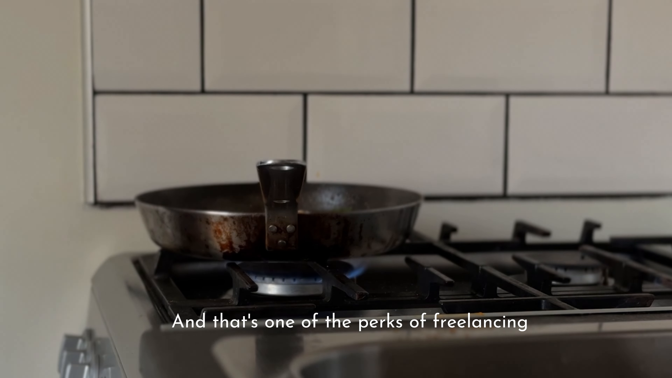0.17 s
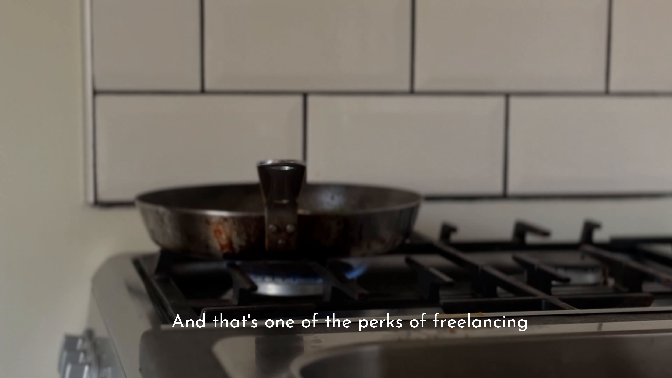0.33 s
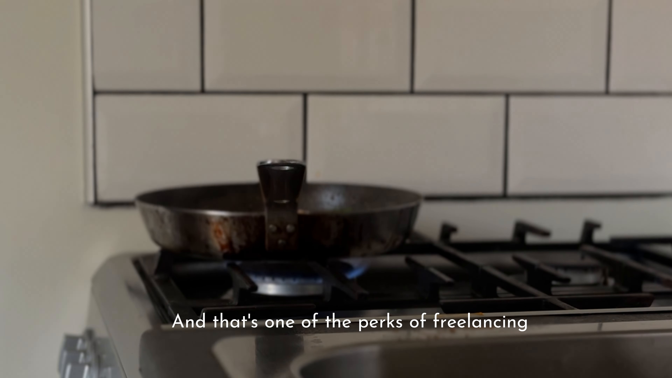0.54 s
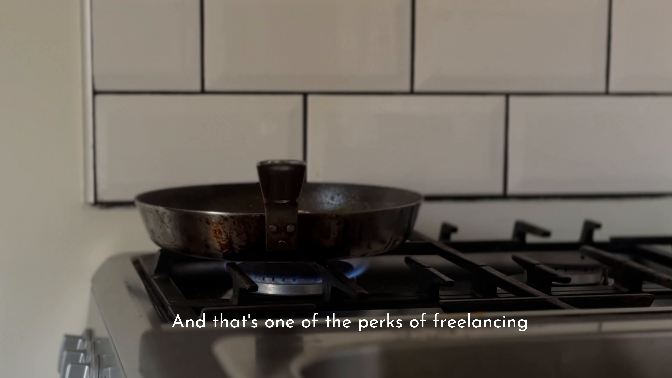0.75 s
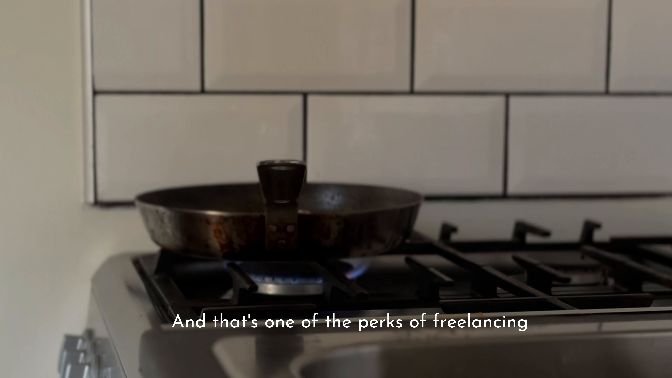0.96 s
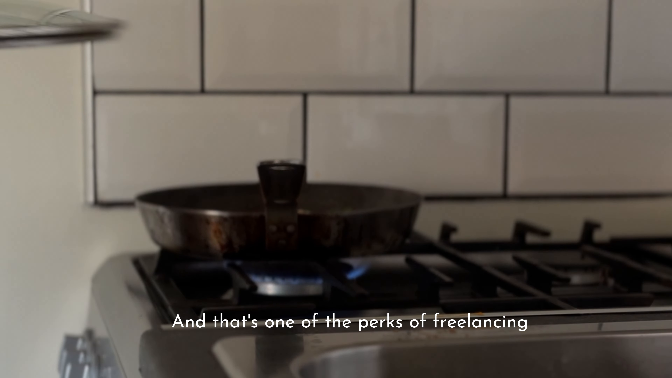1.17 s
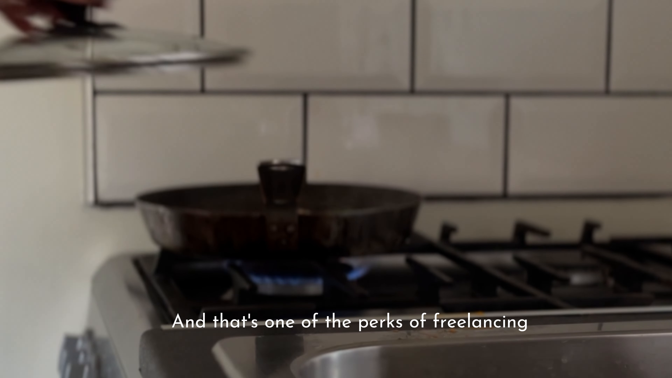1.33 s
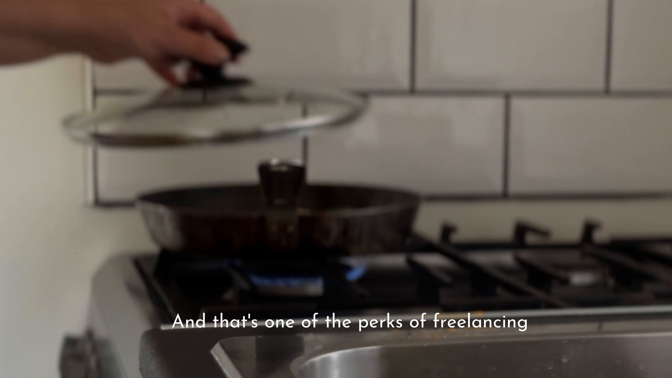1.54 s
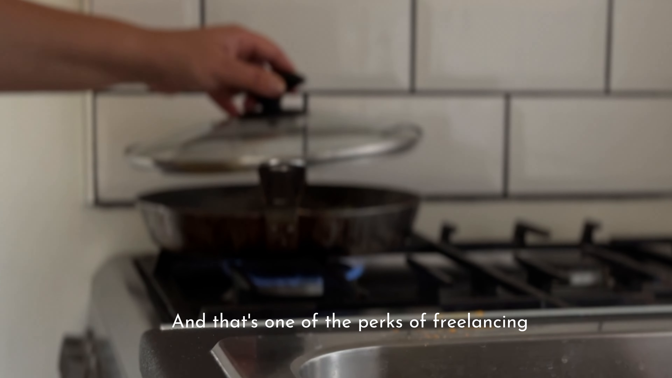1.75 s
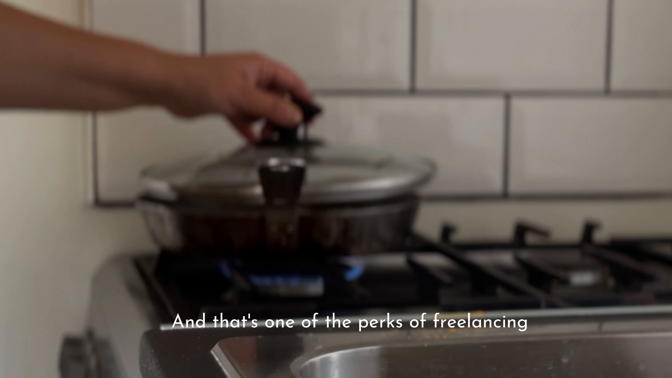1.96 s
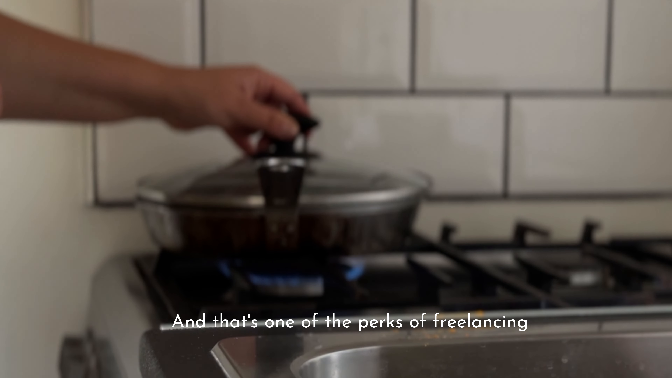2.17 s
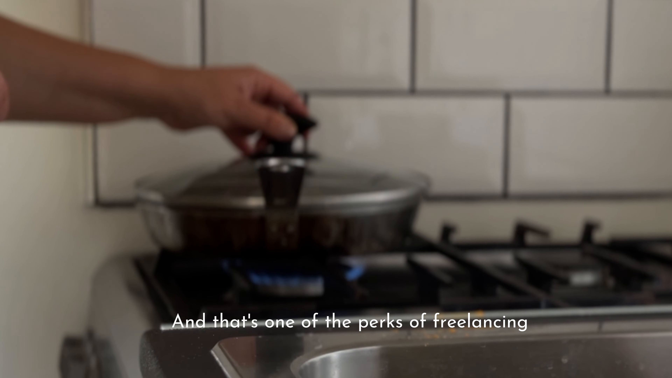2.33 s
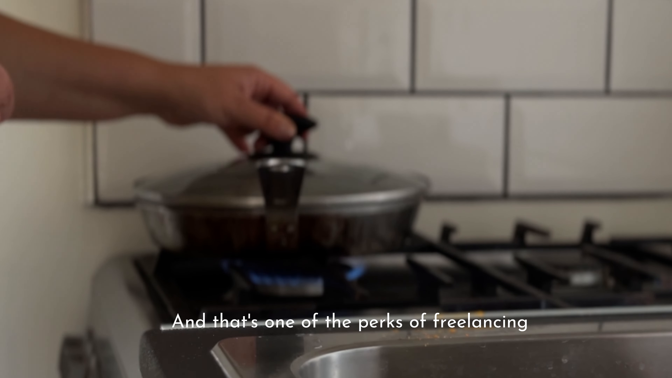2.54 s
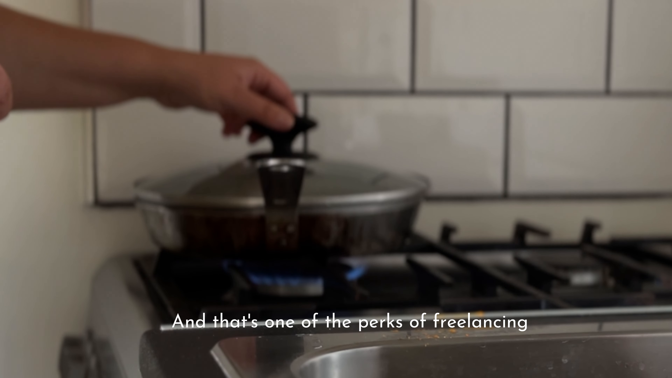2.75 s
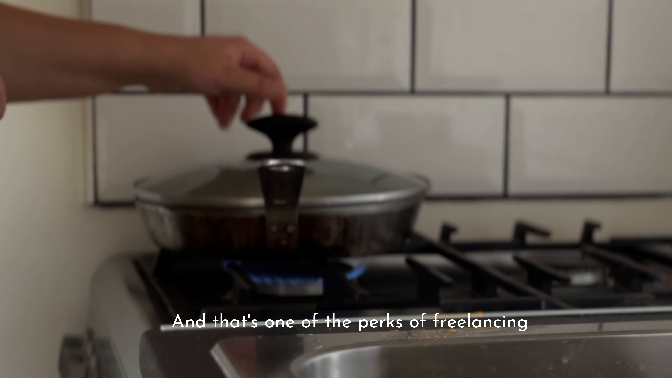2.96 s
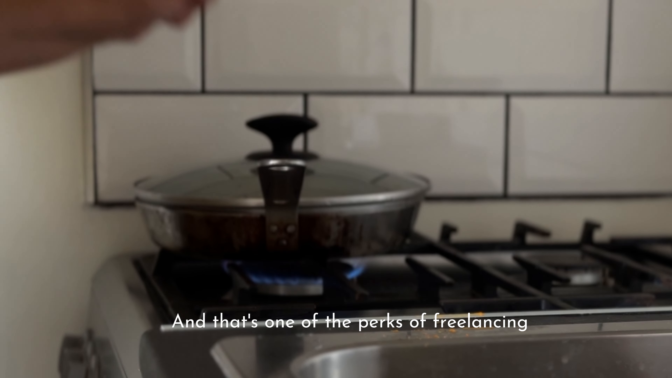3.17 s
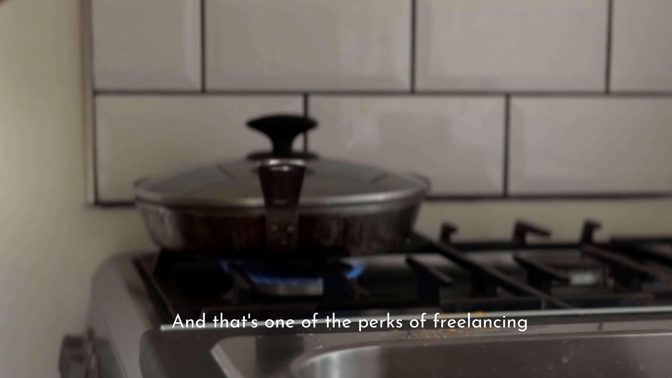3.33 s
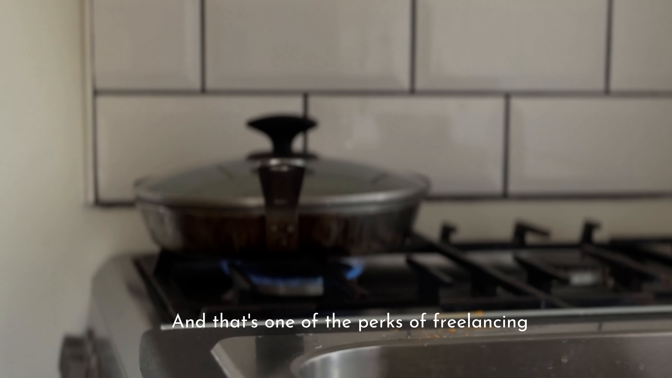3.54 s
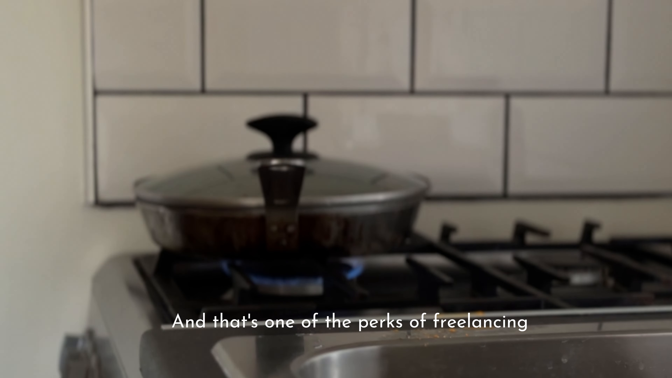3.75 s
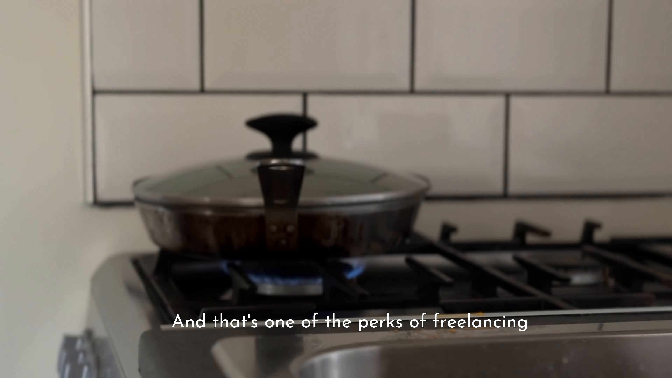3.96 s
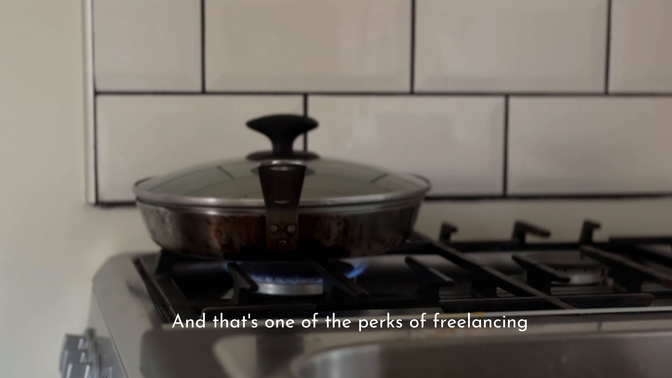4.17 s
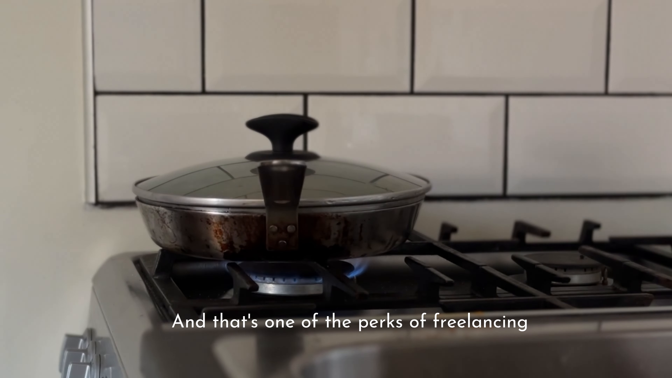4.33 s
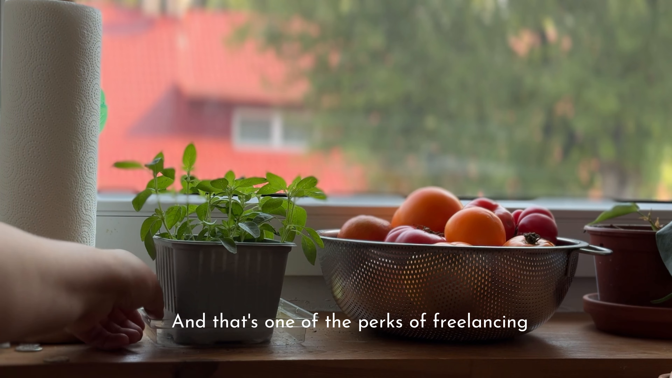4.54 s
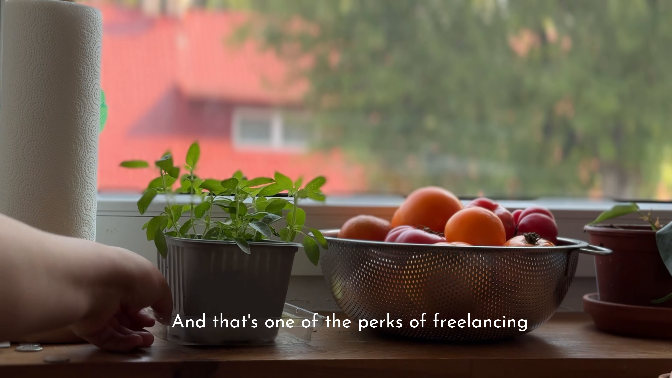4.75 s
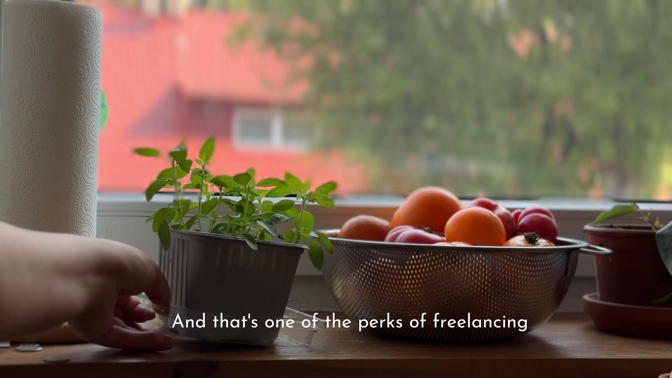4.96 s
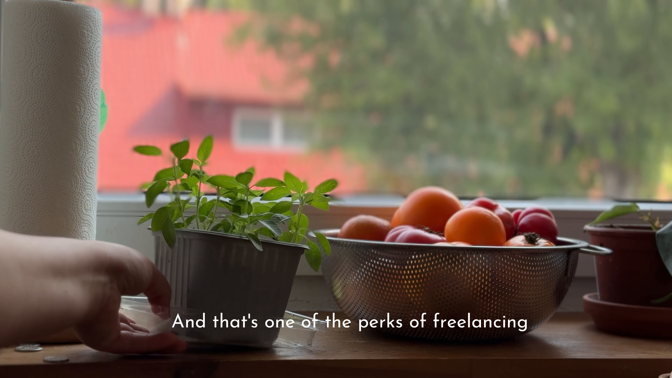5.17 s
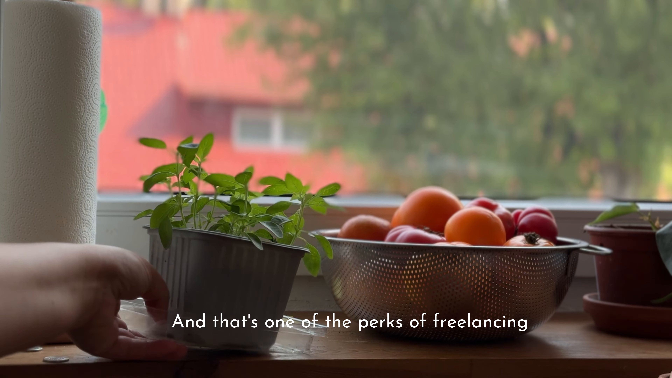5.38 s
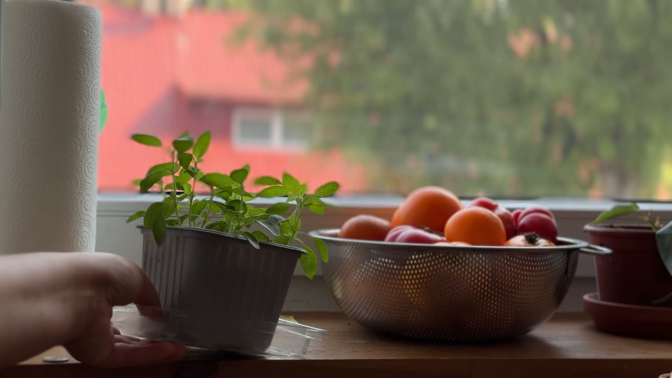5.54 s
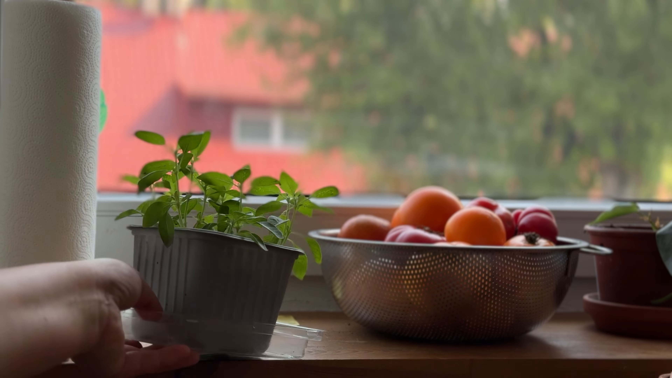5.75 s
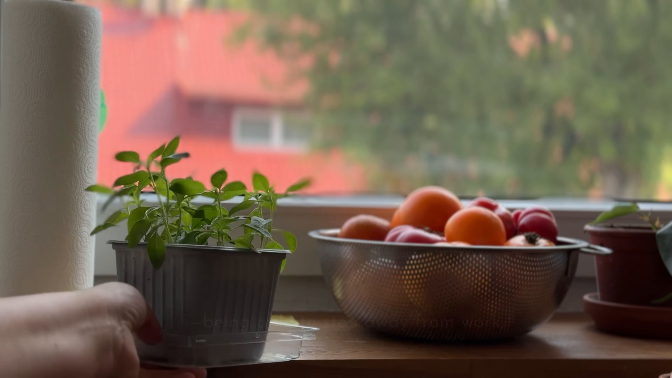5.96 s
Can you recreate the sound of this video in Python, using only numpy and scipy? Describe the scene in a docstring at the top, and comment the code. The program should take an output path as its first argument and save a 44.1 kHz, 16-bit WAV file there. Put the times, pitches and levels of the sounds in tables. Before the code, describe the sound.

From the start a gas ring burns close by in a small kitchen: a flickering low roar, swelling and settling, under a steadier soft hiss. Faint rustles and short hollow scrapes suggest someone busy nearby, with a small knock at 0.5 s and a soft tick at 1.8. At about 2.06 to 2.2 s a glass lid meets the metal pan in a quick cluster of knocks, clanking and ringing briefly, with a low hob boom damped by 2.4. A light bright tick follows at 3.1, then mostly flame, with a small click and rub near 3.8. At 4.6 s the burner cuts abruptly to quiet, low room air at a window sill. A thin plastic pot rustles and scrapes over a plastic tray; crisp snaps and dull thuds gather from 5.2, strongest at 5.6, continuing lightly until 6 s. Stereo, slightly roomy.

```python
"""A gas ring roars and hisses softly (coloured noise that swells) while a glass lid knocks and rattles home
(fading sine tones, dull noise and bright cracks). Then, at a quieter window sill, a thin plastic pot is
dragged over a plastic tray: noise grains scrape and rustle, short noise bursts snap, low tones thud.
A small microphone pair hears it all in stereo, a little roomy."""
import sys
import numpy as np
from scipy import signal
from scipy.fft import rfft, irfft, next_fast_len
from scipy.io import wavfile
from scipy.ndimage import uniform_filter1d

SR = 44100
rng = np.random.default_rng(int(sys.argv[2]) if len(sys.argv) > 2 else 0)


def digitize_waveform(pressure):
    """Quantize a signal to 16-bit integers and store it at the path in sys.argv[1].

    Rows of a 2-D input are taken as channels; values are limited to [-1, 1].
    """
    field = np.atleast_2d(pressure).T
    bounded = np.clip(field, -1, 1)
    quanta = np.round(bounded * 32767).astype(np.int16)
    wavfile.write(sys.argv[1], SR, quanta)


def field_ratio(decibels):
    """Amplitude ratio for a level in dB (20 dB per decade); scalars and array-likes work."""
    return 10 ** (np.asarray(decibels, dtype=float) / 20)


N = 264820
PADDED = next_fast_len(N)  # length for quick filtering [samples]
HZ = np.maximum(np.fft.rfftfreq(PADDED, 1 / SR), 1)
TIME = np.arange(N) / SR
MOVE_S = 4.585  # the stove gives way to the sill


def unit(x):
    """Scale to rms 1."""
    return x / np.sqrt(np.mean(x ** 2))


def along(table, at):
    """Columns of a table read between its rows."""
    key, *columns = np.transpose(table)
    return [np.interp(at, key, column) for column in columns]


def colour(table):
    """Gain per frequency from (frequency [Hz], level [dB]) points."""
    hz, db = np.transpose(table)
    return field_ratio(np.interp(np.log(HZ), np.log(hz), db))


def hump(hz, octaves):
    """Bell-shaped gain around a centre frequency."""
    return np.exp(-(np.log2(HZ / hz) / octaves) ** 2 / 2)


def shape(x, gain):
    """Filter by a gain per frequency."""
    return irfft(rfft(x, PADDED) * gain, PADDED)[..., :N]


def air():
    """White noise at 0 dB per Hz, one for each of two paths to the microphone."""
    return rng.standard_normal((2, N)) * np.sqrt(SR / 2)


def walk(rate):
    """Smoothly wandering random values, a new one every 1 / rate seconds; spread near 0.7."""
    k = int(SR / rate)
    steps = np.repeat(rng.standard_normal(N // k + 1), k)
    return 0.98 * uniform_filter1d(uniform_filter1d(steps, k), k)[:N]


def fade(start, t60, rise):
    """Envelope of a hit: quick rise, exponential fall, over after 90 dB."""
    out = np.zeros(N)
    span = slice(int(start * SR) + 1, int((start + 3 * t60 / 2) * SR))
    t = TIME[span] - start
    out[span] = (1 - np.exp(-t / rise)) * field_ratio(-60 * t / t60)
    return out


def stove():
    """Turbulent flame: a flickering low roar and burn, with a steadier jet hiss above them."""
    # roar and hiss before the flame's swells: (frequency [Hz], level [dB per Hz])
    flame_colour = [(20, -92), (42, -71), (60, -76), (180, -76), (400, -80.5), (700, -85), (1400, -90),
                    (1900, -101), (4000, -104), (5500, -101), (8500, -100), (11800, -105), (12600, -110),
                    (16000, -112)]
    # resonances: cupboards and walls low down, overtones of the burner's mixing tube above 1 kHz:
    # (frequency [Hz], width [Hz], level [dB per Hz])
    resonances = [(44.7, 3.4, -68), (84, 5.8, -63), (149.6, 18, -72), (1087, 234, -84.5), (1670, 93, -90.5),
                  (2360, 65, -97), (2910, 54, -92), (3400, 170, -99), (4050, 27, -101)]
    # the flame swells and settles: (time [s], gain of the roar [dB], gain of the burn [dB])
    swells = [(0, 3, 7.5), (0.27, 3.5, 4), (1.23, 3, 5.5), (1.5, 1.5, 2), (2.02, 1, 2.2), (2.45, 1.7, -1.5),
              (2.65, 0.7, 1.5), (3.5, 2.5, -1), (3.85, 0.8, 2), (4.2, 3.5, 0), (4.45, 0.6, 0.8),
              (4.58, -1, -1)]
    peaks = sum(field_ratio(2 * db) / (1 + (2 * (HZ - hz) / width) ** 2) for hz, width, db in resonances)
    gain = np.sqrt(colour(flame_colour) ** 2 + peaks)
    low_db, mid_db = along(swells, TIME)
    # shares of the power: roar below 330 Hz, hiss above 1800 Hz, burn between
    low = 1 / (1 + (HZ / 330) ** 4)
    high = 1 / (1 + (1800 / HZ) ** 6)
    roar = shape(air(), gain * np.sqrt(low)) * field_ratio(low_db + 1.4 * walk(9))
    burn = shape(air(), gain * np.sqrt((1 - low) * (1 - high))) * field_ratio(mid_db + 2.45 * walk(14))
    hiss = shape(air(), gain * np.sqrt(high)) * field_ratio(0.25 * walk(10.2))
    return roar + burn + hiss


def lid():
    """Each touch rings the same modes with new phases and adds a crack, brighter when hard; the hob booms."""
    # lid meets the rim: (time [s], blow level [dB], crack level relative to the blow [dB])
    touches = [(2.059, -15, -24), (2.089, -33.5, -1.5), (2.093, -12.5, -33), (2.113, -18.5, -41),
               (2.131, -37, -31), (2.163, -28.5, -28), (2.211, -33, -16)]
    # ringing modes of lid and pan: (frequency [Hz], relative level [dB], t60 [s])
    modes = [(130.7, -9, 0.53), (186.5, -4.5, 0.25), (213.3, -5, 0.23), (340, -12.5, 0.22),
             (434, -8.5, 0.54), (468, 0.5, 0.24), (526.7, 1.5, 0.25), (577, 4.5, 0.16), (625, 1, .2),
             (810, -19, 0.13), (900, -18, 0.22), (1036, -13, 0.35), (1410, -26, 0.38), (1533, -17, 0.27),
             (2261, -25.5, .25), (2630, -19, 0.22)]
    # boom of the hob panel: (frequency [Hz], level [dB], t60 [s])
    boom = (86, -27.5, 1.5)
    boom_start_s, boom_stop_s = 2.098, 2.385  # the hob panel booms until the hand presses down
    side_rad, side_scatter_rad = 2.4, 1  # the lid sits off to one side: its second path runs ahead

    out = np.zeros((2, N))
    crack = unit(shape(air(), hump(2160, 1.0)))
    clank = unit(shape(air(), hump(510, 1.06)))
    chance = rng.standard_normal((len(touches), len(modes), 2, 1)) * [[1.1], [side_scatter_rad]]
    chance[:, :, 1] += chance[:, :, 0] + side_rad
    near = slice(int(touches[0][0] * SR), int((touches[-1][0] + 1) * SR))
    for (start, db, hard_db), phases in zip(touches, chance):
        # the soft push peaks a few ms in, where the modes swing together
        t = TIME[near] - start - 0.005
        for (hz, mode_db, t60), phase in zip(modes, phases):
            tone = np.cos(2 * np.pi * hz * t + phase)
            out[:, near] += field_ratio(db - 9.5 + mode_db) * fade(start, t60, 0.0025)[near] * tone
        out += field_ratio(db - 18.0) * clank * fade(start, 0.23, 0.0027)  # modes too dense to tell apart
        crack_fade = fade(start, 0.027, 0.00069) + field_ratio(-8) * fade(start, 0.32, 0.0052)
        out += field_ratio(db + hard_db) * crack * crack_fade
    hz, db, t60 = boom
    held = np.clip((boom_stop_s - TIME) / 0.025, 0, 1)
    boom_level = field_ratio(db + 1.3 * walk(25.1)) * held * fade(boom_start_s, t60, 0.02)
    return out + boom_level * np.sin(2 * np.pi * hz * TIME)


def snaps():
    """Thin plastic or metal gives: a bright crack with weaker slips after it, and a ringing body."""
    # metal and glass touched at the stove:
    # (time [s], body level [dB], centre [Hz], width [octaves], t60 [s], crack level [dB])
    ticks = [(0.538, -32, 620, 0.7, 0.048, -55), (1.760, -30, 1290, 1.64, 0.2, -53),
             (3.07, -47, 7040, 1.2, 0.2, -41), (3.798, -36, 1140, 1.5, 0.045, -40.5)]
    # the plastic pot and tray snap: (time [s], body level [dB], centre [Hz], crack level [dB])
    plastic = [(4.641, -60, 3400, -46), (4.699, -53.5, 4900, -41), (4.756, -58, 4970, -58),
               (5.186, -48, 2840, -55), (5.224, -49, 3420, -31), (5.266, -38, 6050, -25),
               (5.377, -44, 3000, -34), (5.401, -45, 3000, -31), (5.549, -36, 2950, -33.5),
               (5.582, -35, 5200, -31), (5.6198, -25, 2420, -25.5), (5.72, -34, 2200, -32),
               (5.83, -49.5, 3260, -32.5), (5.933, -54, 3000, -31.5), (5.963, -52, 3170, -56)]
    tick_rise_share = 0.047  # rise time as a share of t60: long rings come from soft, sliding contacts
    snap_octaves, snap_t60_s, snap_rise_s = 0.5, 0.16, 0.0009
    # the contact itself is a short pulse over the body level; slower contacts click less
    click_db, click_cycles, hard_rise_s = 10, 0.51, 0.0018

    out, white = np.zeros((2, N)), air()

    def ring(hz, octaves):
        """Noise of rms 1 around one pitch, the body's sound before it fades."""
        return unit(shape(white, hump(hz, octaves)))

    crack = ring(7900, 1.9)
    crinkle = field_ratio(1.75 * walk(250))  # the sheet buckles unevenly while it rings
    hits = [(*row, tick_rise_share * row[4]) for row in ticks]
    for start, db, hz, crack_db in plastic:
        hits.append((start, db, hz, snap_octaves, snap_t60_s, crack_db, snap_rise_s))
    for start, db, hz, octaves, t60, crack_db, rise in hits:
        body_fade = fade(start, t60, rise) + field_ratio(-18.5) * fade(start, 0.38, 0.02)
        out += field_ratio(db) * ring(hz, octaves) * crinkle * body_fade
        crack_fade = fade(start, 0.014, 0.00028)
        # three slips about 7 ms apart, each 4 dB weaker
        for k, late in enumerate(rng.random(3), 1):
            crack_fade += field_ratio(-4 * k) * fade(start + 0.007 * (k + late - 0.5), 0.019, 0.00067)
        out += field_ratio(crack_db) * crack * crack_fade
        turns = hz * (TIME - start) - 2 * click_cycles
        pulse = np.exp(-(turns / click_cycles) ** 2) * np.sin(2 * np.pi * turns)
        out[0] += field_ratio(db + click_db) * min(hard_rise_s / rise, 1) * pulse
    return out


def handling():
    """Gains of rustle and scrape: the steady bustle plus a bell-shaped swell for each stroke."""
    # someone busy nearby, the steady part: (time [s], airy rustle [dB], hollow scrape [dB])
    bustle = [(0, -55.5, -52.5), (0.4, -58, -56.5), (1.35, -59, -55), (1.5, -56, -64), (1.8, -60.5, -59),
              (2.1, -64, -62), (2.45, -72.5, -80), (2.7, -92, -71), (4.4, -81, -89), (4.62, -69, -71),
              (5.02, -69, -57), (5.12, -76, -68), (5.16, -58.5, -55), (5.5, -59, -53), (5.92, -68, -57.5)]
    # single strokes of sleeve, hand or pot:
    # (peak time [s], half length [s], airy rustle [dB], hollow scrape [dB])
    strokes = [(0.174, 0.035, -56, -56), (0.506, 0.042, -53.5, -44.5), (0.752, .04, -56.5, -68),
               (1.107, 0.052, -57, -43), (1.53, 0.1, -52.5, -75), (3.873, 0.17, -61.5, -58),
               (4.532, 0.047, -60.5, -56.5), (4.73, 0.02, -59, -57), (4.91, 0.075, -55, -49.5),
               (5.237, 0.059, -72, -43.5), (5.31, 0.11, -54, -58), (5.455, 0.033, -58, -50),
               (5.67, 0.087, -58, -45), (5.85, 0.036, -56.5, -57), (5.988, 0.037, -53.5, -54)]
    edge_db = -7  # level half a length from the peak
    power = field_ratio(np.array(along(bustle, TIME))) ** 2
    for peak, half, *db in strokes:
        swell_db = np.array(db)[:, None] + edge_db * ((TIME - peak) / half) ** 2
        power = power + field_ratio(swell_db) ** 2
    return np.sqrt(power)


def moves():
    """Rubbing surfaces: dense grains of uneven size, heard airy and through the hollow of the thing moved."""
    # airy rustle: (frequency [Hz], relative level [dB])
    rustle_colour = [(400, -7), (1200, 4.5), (3000, -0.5), (5500, -1), (8500, 1.5), (11500, -1),
                     (13000, -4), (16000, -2.5)]
    # hollow scrape, one list for the stove and one for the sill: (frequency [Hz], relative level [dB])
    hollows = [
        [(500, -18), (1000, 0), (2300, -0.5), (3500, -2.5), (4200, -15), (8000, -35)],
        [(800, -34), (1500, -9), (2200, -3.5), (2800, 1), (3300, -3), (4600, -12.5), (5900, -9), (6600, -16),
         (9000, -47)],
    ]
    sill_rustle_hz = 1640  # leaves and thin plastic at the sill rustle mostly above this
    rustle_gain, scrape_gain = handling()

    grains = air() * field_ratio(2.6 * rng.exponential(size=N) + 1.64 * walk(60))
    rustle = shape(grains, colour(rustle_colour))
    band = (HZ > 4500) & (HZ < 7000)
    rustle = rustle / np.std(shape(rustle, band))  # rms 1 within this band
    thin_rustle = shape(rustle, 1 / np.sqrt(1 + (sill_rustle_hz / HZ) ** 6))
    rustle = np.where(TIME < MOVE_S, rustle, thin_rustle)

    rub = air() * field_ratio(2.6 * walk(90) + 1.7 * walk(450))
    stove_scrape, sill_scrape = [unit(shape(rub, colour(hollow))) for hollow in hollows]
    scrape = np.where(TIME < MOVE_S, stove_scrape, sill_scrape)
    return rustle * rustle_gain + scrape * scrape_gain


def thuds():
    """A board rings on one low note inside a dull burst from the wall behind it."""
    # worktop and sill thud under a weight: (time [s], level [dB], frequency [Hz])
    weights = [(0.538, -43, 336), (1.759, -41, 478), (5.187, -38.5, 203), (5.223, -63, 750),
               (5.264, -48.5, 1410), (5.4, -42.5, 570), (5.548, -42.5, 288), (5.581, -50, 281),
               (5.619, -35, 282), (5.718, -35, 208), (5.744, -43.5, 389), (5.933, -46, 202)]
    wall = unit(shape(air(), hump(447, 0.95)))
    out = np.zeros((2, N))
    for start, db, hz in weights:
        note = np.sin(2 * np.pi * hz * (TIME - start)) * fade(start, 0.2, 0.0045)
        burst = field_ratio(-3) * wall * fade(start, 0.2, 0.0024)
        out += field_ratio(db) * (note + burst)
    return out


def sill_air():
    """Still air at the window sill: steady, quiet noise, strongest low down."""
    # (frequency [Hz], level [dB per Hz])
    still_air = [(20, -102), (50, -81.5), (90, -77), (200, -80), (400, -83), (600, -84), (900, -94.5),
                 (1500, -95), (4000, -101), (8000, -105), (16000, -110)]
    return shape(air(), colour(still_air))


def scene():
    """Stove, then sill, under all the handling; two unrelated noise paths."""
    there = np.clip((TIME - MOVE_S) / 0.0088, 0, 1)  # 0 at the stove, 1 at the sill
    place = stove() * (1 - there) + sill_air() * there
    return place + lid() + snaps() + moves() + thuds()


def low_pass(x):
    """Removes everything above the highest recorded frequency."""
    return signal.sosfilt(signal.butter(12, 16890, fs=SR, output="sos"), x)


def record(dry):
    """Left and right share the paths by likeness, with a phase difference per frequency, opposite near 8-9 kHz.

    Both ends of the band are cut."""
    # stereo image by frequency: (frequency [Hz], phase of left over right [rad], likeness [0-1])
    stereo_image = [(60.6, 0, 1), (288, 0.5, 0.89), (490, 0, 0.57), (750, 1.5, 0.33), (950, 0.2, 0.6),
                    (1240, 0.84, 0.87), (1730, 0, 0.99), (2360, 0.3, 1), (3000, -0.33, 0.87),
                    (3370, 0.61, 1), (7070, 0, 0.97), (7764, np.pi, 0.99), (9300, np.pi, 0.97),
                    (9640, 3.5, 0.76), (9580, 2.5, 0.8), (16200, 1, 0.8)]
    bass_hz, top_hz = 30.8, 15950
    phase, alike = along([(np.log(hz), a, b) for hz, a, b in stereo_image], np.log(HZ))
    alike = np.clip(alike, 0, 1)
    shared, apart = rfft(dry, PADDED) * np.sqrt([(1 + alike) / 2, (1 - alike) / 2])
    turn = np.exp(0.5j * phase)  # each side takes half the phase difference
    left_right = np.array([(shared + apart) * turn, (shared - apart) / turn])
    band = (HZ < top_hz) / np.sqrt(1 + (bass_hz / HZ) ** 8)
    mix = irfft(left_right * band, PADDED)[:, :N]
    return low_pass(mix)


dry = scene()
out = record(dry)
digitize_waveform(out)
```